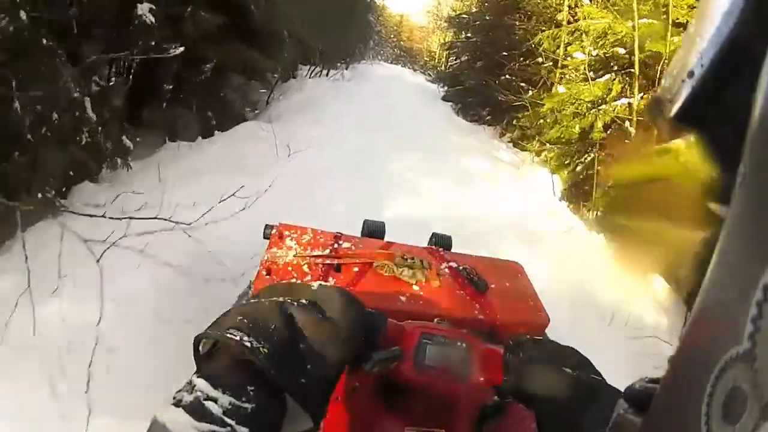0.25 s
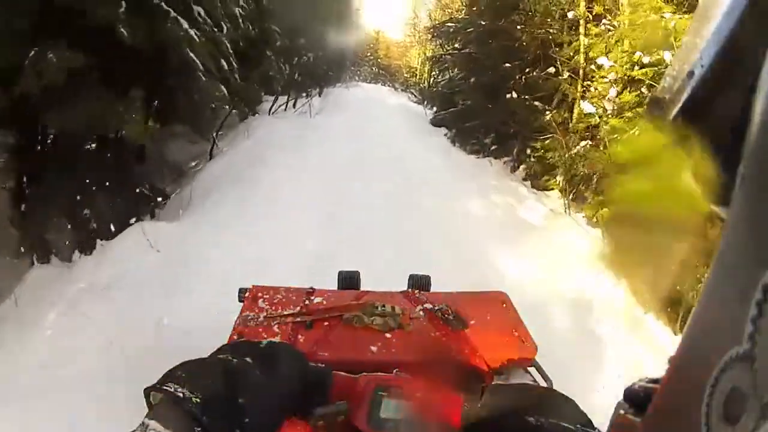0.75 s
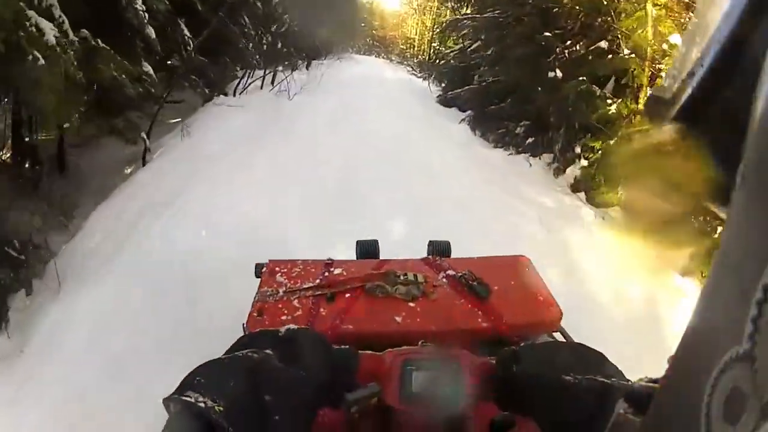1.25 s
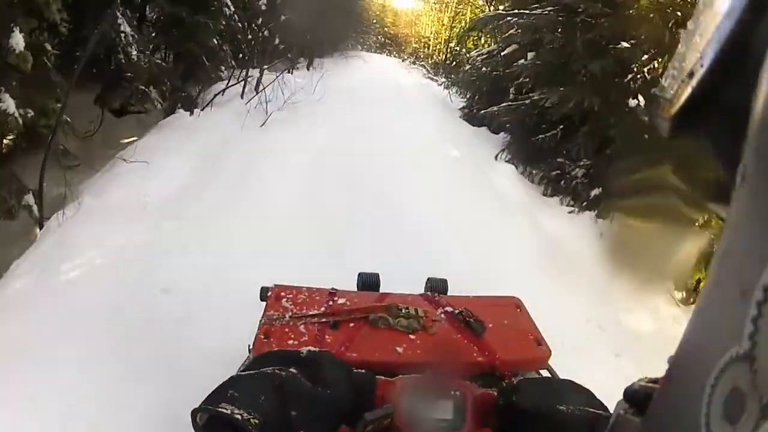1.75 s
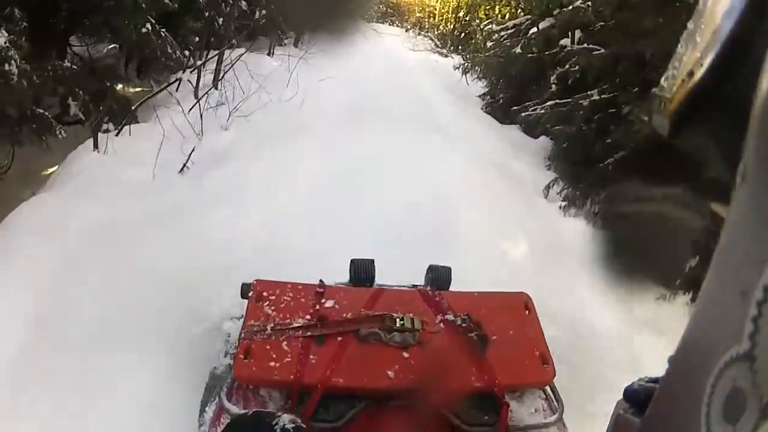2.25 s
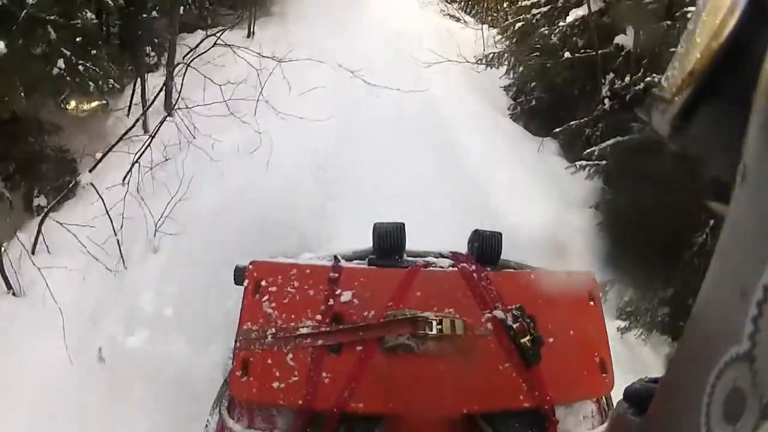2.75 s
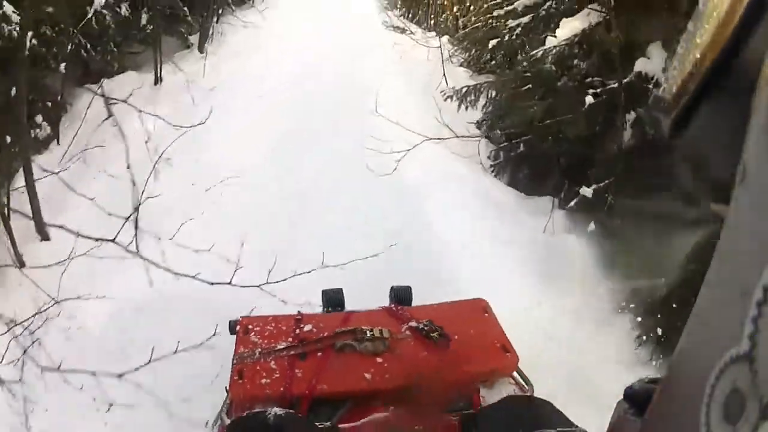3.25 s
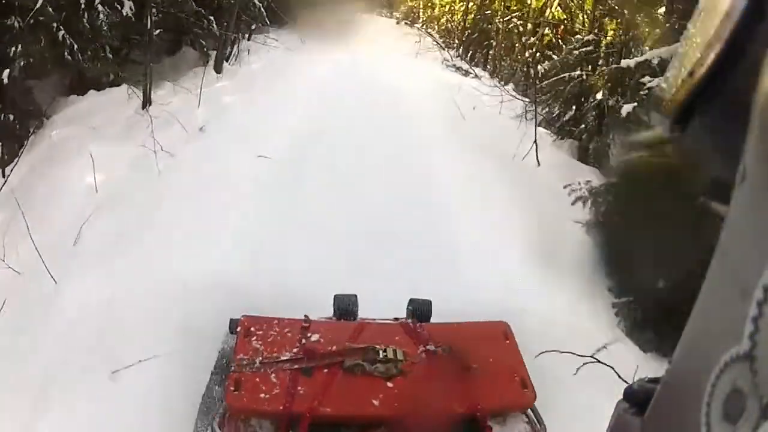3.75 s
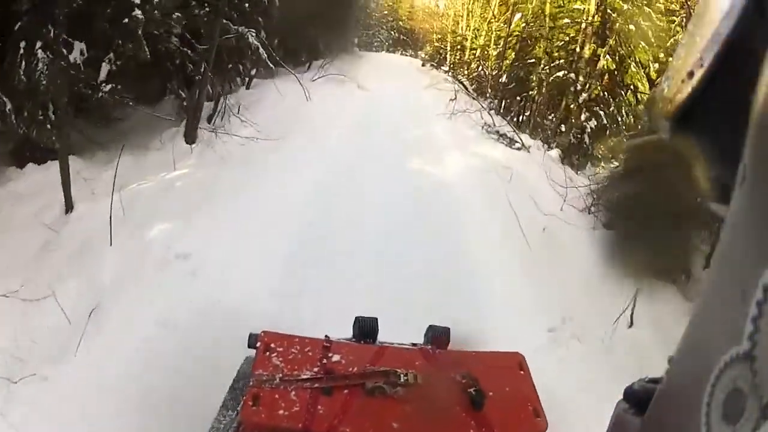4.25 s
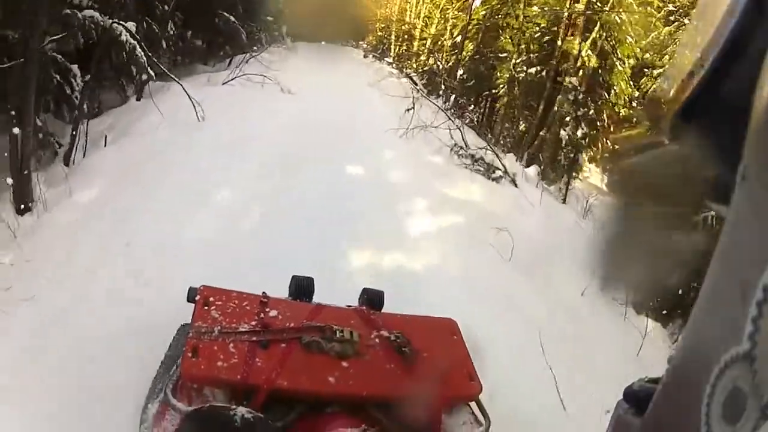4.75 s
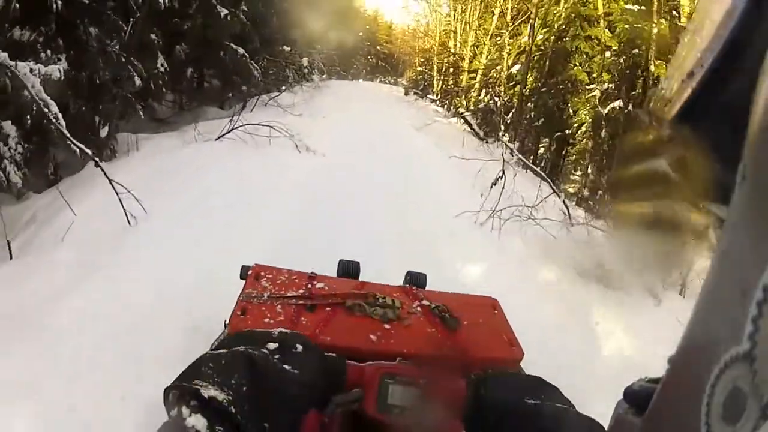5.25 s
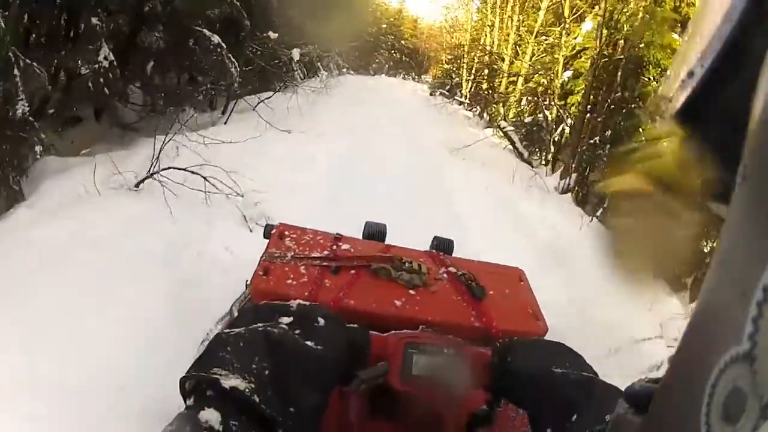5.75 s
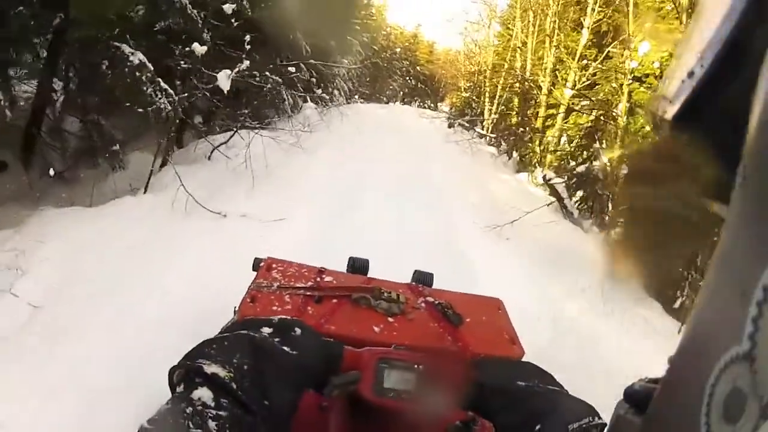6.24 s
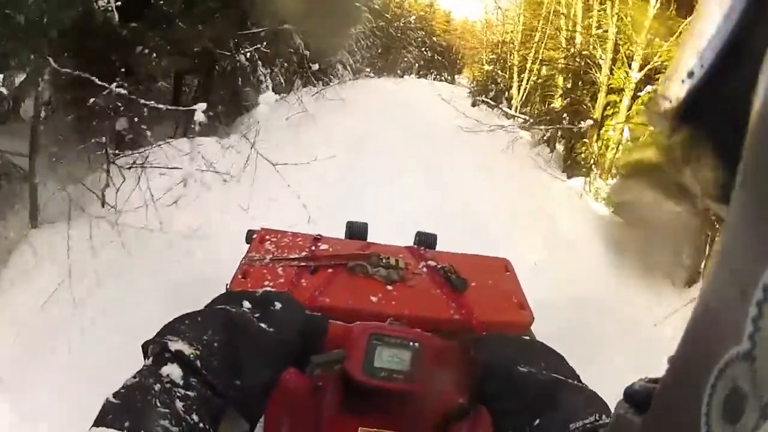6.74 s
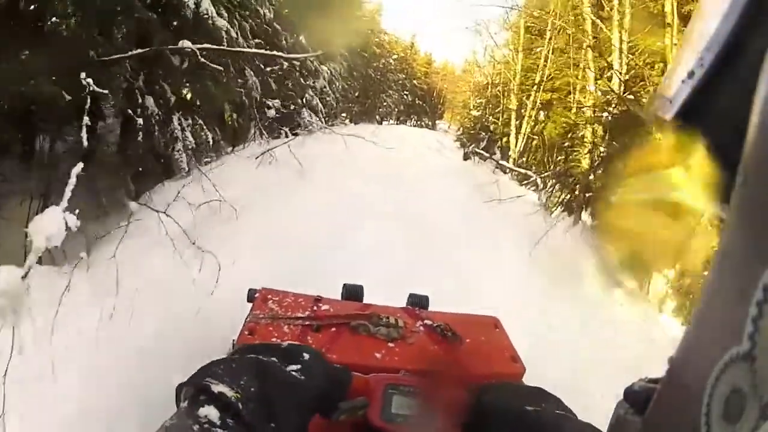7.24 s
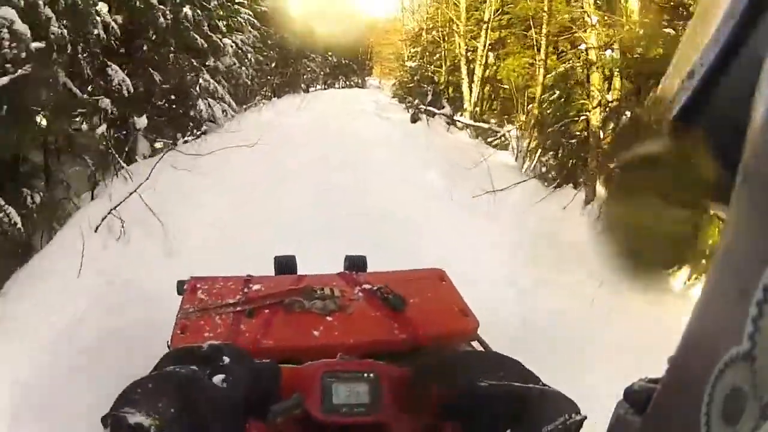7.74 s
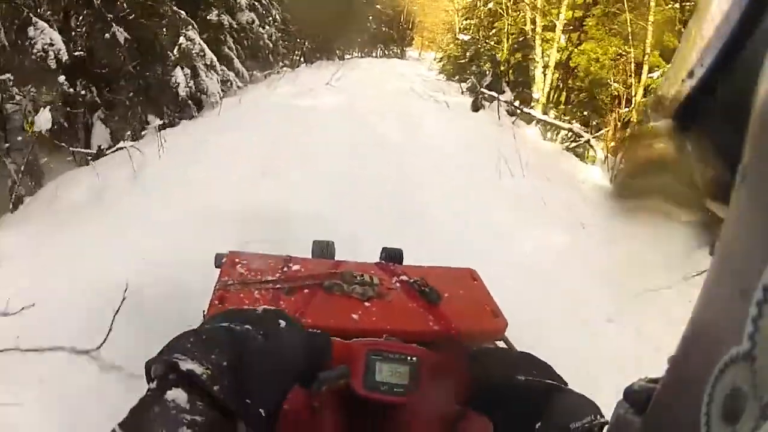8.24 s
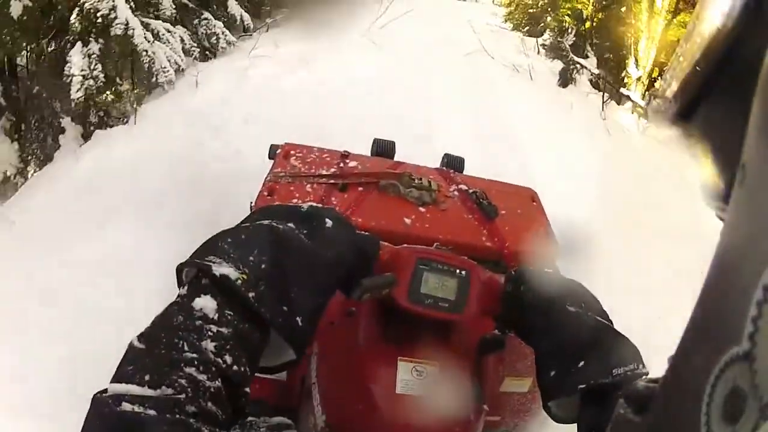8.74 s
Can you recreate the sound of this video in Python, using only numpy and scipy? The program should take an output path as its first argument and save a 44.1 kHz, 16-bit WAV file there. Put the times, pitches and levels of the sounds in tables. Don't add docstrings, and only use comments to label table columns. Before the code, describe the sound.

A quad bike engine labours steadily through deep snow, its raspy, rattling drone sagging twice, then climbing and holding strong.

```python
import sys
import numpy as np
from scipy import signal
from scipy.fft import rfft, irfft
from scipy.io import wavfile
from scipy.ndimage import uniform_filter1d

SR = 44100
rng = np.random.default_rng(int(sys.argv[2]) if len(sys.argv) > 2 else 0)


def transcribe(signal):
    frames = np.atleast_2d(signal).T
    limited = np.clip(frames, -1, 1)
    pcm = np.round(limited * 32767).astype(np.int16)
    wavfile.write(sys.argv[1], SR, pcm)


def nominal_scale(level):
    x = np.asarray(level, float) / 20
    return 10 ** x


N = 396459
T = np.arange(N) / SR
CRUISE_HZ, CRUISE_DB = 53, -25


def evened(x):
    return x / np.sqrt(np.mean(x ** 2) + 1e-20)


def coloured(points):
    hz, db = np.transpose(points)
    log_hz = np.log(np.fft.rfftfreq(N + 1, 1 / SR) + 1)
    shape_db = np.interp(log_hz, np.log(hz), db, left=-90, right=-90)
    spectrum = rfft(rng.standard_normal(N + 1)) * nominal_scale(shape_db)
    return evened(irfft(spectrum, N + 1)[:N])


def drift(hz, at):
    knots = np.arange(0, N / SR + 1, 1 / hz)
    return 1.22 * np.interp(at, knots, rng.standard_normal(len(knots)))


def ring(x, hz, width):
    r = np.exp(-np.pi * width / SR)
    poles = [1, -2 * r * np.cos(2 * np.pi * hz / SR), r * r]
    once = signal.lfilter([1], poles, x)
    return evened(signal.lfilter([1], poles, once))


def resonances(x, table):
    return evened(sum(nominal_scale(db) * ring(x, hz, width) for hz, width, db in table))


def controls(table):
    s, *columns = np.transpose(table)
    return [np.interp(T, s, c) for c in columns]


def bumps(rows):
    return sum(top * np.exp(-((T - s) / np.where(T < s, rise, fall)) ** 2) for s, top, rise, fall in rows)


def per_wave(turns, spread_db):
    phase = turns + .1
    second = phase % 1 > .34
    firing = 2 * np.floor(phase).astype(int) + second
    strength_db = spread_db * rng.standard_normal(2400)[firing + 2]
    return nominal_scale(uniform_filter1d(strength_db, size=60))


def gate(turns, first, second, decay, steady):
    rush = first * np.exp(-(turns % 1) / decay)
    rush = rush + second * np.exp(-((turns - .33) % 1) / decay)
    return evened(uniform_filter1d(steady + rush, size=30))


def blows(turns, first, second):
    opens = []
    for lead in (.015, .7):
        count = np.floor(turns + lead + .007 * drift(90, T))
        opens.append(np.diff(count, prepend=0) > 0)
    return (first * opens[0] + second * opens[1]) * per_wave(turns, 0.97)


# (frequency [Hz], density [dB per Hz])
RUMBLE_SPECTRUM = [(25, -37), (70, 0), (130, -8), (250, -3), (500, 2), (800, -4), (1100, -3), (1400, -5)]


def rumble(turns, level_db):
    rush = gate(turns, 0.97, 0.2, 0.14, 0.93)
    return nominal_scale(level_db - 19) * rush * coloured(RUMBLE_SPECTRUM)


# (frequency [Hz], width [Hz], level [dB])
CASING_RINGS = [(928, 43, 1), (1049.7, 63, 4)]


def casing(turns, hz, level_db):
    knocks = rng.standard_normal(N) * gate(turns, 1.0, 1.24, 0.077, 0.14)
    loose_db = 1.18 * (54.5 - hz)
    return nominal_scale(level_db - 8.0 + loose_db) * resonances(knocks, CASING_RINGS)


# (frequency [Hz], density [dB per Hz])
RASP_SPECTRUM = [(680, -18.5), (1150, -9.5), (1390, -7.5), (1490, -5.5), (1620, -8.5), (1820, -1),
                 (1910, -4), (2470, -1), (3020, -18), (3370, -12.5), (4310, -24), (5250, -22),
                 (5900, -27.5), (7670, -49), (13000, -120)]
# (frequency [Hz], width [Hz], level [dB])
HOUSING_RINGS = [(1249, 210, -7), (1648, 180, 0.5), (2002, 306, -1), (2481, 240, -1)]


def rasp(turns, level_db, sharp):
    hiss = coloured(RASP_SPECTRUM)
    dull = signal.butter(4, 3000, fs=SR, output="sos")
    gas = hiss * gate(turns, 1.1, .55, .22, .9) * per_wave(turns, .6)
    gas = signal.sosfiltfilt(dull, gas)
    churn = hiss - signal.sosfiltfilt(dull, hiss)
    churn = churn * gate(turns, .35, .3, .2, 1.1)
    crack = resonances(blows(turns, 0.81, 0.8), HOUSING_RINGS)
    sharp = np.clip(sharp, 0, .9)
    mix = np.sqrt(1 - sharp ** 2) * gas + 1.14 * churn + sharp * crack
    return nominal_scale(level_db + .25 * drift(11, T)) * mix


PRESSURE_WAVES = [
    (0, .17, .011, .17, .03, .1),
    (.305, .22, .015, .24, .035, .05),
    (.66, .03, .03, .09, .03, .15),
]


def puff_shape(k, hz):
    w = 2 * np.pi * k
    lag = 0.031 * (54.4 - hz) / 8
    shape = 0
    for n, (place, dip, width, puff, delay, decay) in enumerate(PRESSURE_WAVES):
        suction = dip * width * np.sqrt(2 * np.pi) * np.exp(-(w * width) ** 2 / 2)
        push = puff * decay * np.exp(-1j * w * delay)
        push = push / (1 + 1j * w * decay) / (1 + 1j * w * width / 2)
        shape = shape + (push - suction) * np.exp(-1j * w * (place + lag * (n == 1)))
    return shape * np.exp(-1j * w * .07 * (k > 15))


# (multiple of the cycle, level [dB])
EASED_ORDERS = [(1, -14), (2, -8), (3, -2), (4, -8), (5, -2), (6, 0), (7, -11), (8, -7), (9, -8), (10, -13),
                (11, -13), (12, -17), (13, -28), (14, -22), (15, -19), (16, -25), (17, -26), (18, -28),
                (19, -27), (20, -23)]
PART_ORDERS = [(1, -11), (2, -14), (3, 0), (4, -6), (5, -14), (6, -1), (7, -4), (8, -16), (9, -6),
               (10, -11), (11, -28), (12, -14), (13, -17), (14, -25), (15, -25), (16, -20), (17, -25),
               (18, -19), (19, -22), (20, -23)]
FULL_ORDERS = [(1, -10), (2, -20), (3, 0), (4, -5), (5, -13), (6, -1), (7, -4), (8, -15), (9, -9), (10, -8),
               (11, -16), (12, -14), (13, -12), (14, -18), (15, -25), (16, -12), (17, -9), (18, -20),
               (19, -12), (20, -24)]
FREE_ORDERS = [(1, -8), (2, -21), (3, 0), (4, -5), (5, -9), (6, -3), (7, -5), (8, -13), (9, -5), (10, -6),
               (11, -14), (12, -27), (13, -11), (14, -15), (15, -21), (16, -12), (17, -14), (18, -19),
               (19, -13), (20, -23)]
ORDER_SPEEDS = [46.7, 50.14, 54.63, 55.1]


def exhaust(turns, hz, gaps_db, level_db, bark_db, casing_db):
    slow = slice(0, N, 16)
    k = np.transpose(FULL_ORDERS)[0][:, None]
    phases = np.angle(puff_shape(k, hz[slow]))
    patterns = np.array([EASED_ORDERS, PART_ORDERS, FULL_ORDERS, FREE_ORDERS])[:, :, 1].T
    db = []
    for n, pattern in enumerate(patterns):
        db.append(np.interp(hz[slow], ORDER_SPEEDS, pattern) + 0.73 * np.sqrt(n) * drift(3, T[slow]))
    dullness_db = np.minimum(bark_db - level_db + 5.5, 0)[slow]
    top_of_bark = np.clip(k - 11.5, 0, 2) * (k < 16)
    height = nominal_scale(np.array(db) + 0.68 * dullness_db * top_of_bark)
    groups = [(0, 7, level_db - .3), (7, 15, bark_db - .7),
              (15, 20, casing_db - 1.0 - .8 * (54.4 - hz))]
    for first, last, group_db in groups:
        total = np.sqrt((height[max(first, 2):last] ** 2).sum(0))
        height[first:last] *= nominal_scale(group_db[slow]) / total
    height[[1, 3, 4, 0]] = nominal_scale(np.array(gaps_db)[:, slow])
    out = np.zeros(N)
    for order, size, phase in zip(2 * np.pi * k, height, phases):
        out += np.repeat(size, 16)[:N] * np.cos(order * turns + np.repeat(phase, 16)[:N])
    return np.sqrt(2) * per_wave(turns, .55) * out


# (time [s], speed change [Hz], exhaust change [dB], half length [s])
DRIFT_LURCHES = [(0.171, 0.74, 1.2, 0.077), (0.498, .3, 1.2, .1), (1.25, .1, 2.5, .06),
                 (2.27, 0.28, 0.5, .1), (2.864, 0.39, 1.5, 0.063), (3.0, -0.27, -2.5, .04),
                 (3.093, 0.096, 1.5, .05), (3.224, -0.61, -1, .05), (3.4, 0.197, 1, .08),
                 (4.019, -.6, 0.5, 0.051), (4.139, 0.28, -1.5, 0.059), (5.9, -.4, 0, .1),
                 (8.351, 0.78, 0.8, .2)]


def lurches():
    speed = bumps([(s, up, w, w) for s, up, db, w in DRIFT_LURCHES])
    level = bumps([(s, db, w, w) for s, up, db, w in DRIFT_LURCHES])
    return speed, level


# (time [s], cycles a second [Hz])
ENGINE_SPEED = [(0, 53.25), (.3, 52.6), (.87, 50.58), (1.35, 50.2), (1.53, 48), (1.77, 47.52), (2.1, 50.33),
                (2.52, 49.24), (2.73, 46.26), (3.03, 46.6), (3.42, 52.69), (3.95, 53.3), (4.46, 55.82),
                (4.98, 53), (5.35, 54.01), (7.38, 54.6), (7.75, 52.65), (8.99, 53.23)]


def engine_speed(lurch_hz):
    hz, = controls(ENGINE_SPEED)
    return uniform_filter1d(hz, size=2600) + .08 * drift(7, T) + lurch_hz


# (time [s], exhaust level [dB], helmet turned toward the pipe [dB])
THROTTLE_AND_HEAD = [(0.0, -27, -1.5), (0.02, -26, 0.6), (1.33, -27.5, -0.1), (1.5, -29, 1),
                     (2.0, -26, 3.5), (2.23, -27.5, 2), (2.5, -32, 0.8), (2.73, -32.5, -1.5),
                     (3.6, -25, 2.4), (3.91, -28, -0.7), (4.51, -28, -0.6), (4.78, -28, -0.3),
                     (5.46, -25.5, 0.4), (5.83, -25.5, 0.7), (6.23, -24, -0.1), (7.91, -25.5, -0.3),
                     (8.91, -26.5, 0.6), (8.99, -27, 0.1)]


def throttle(lurch_db):
    level_db, turn_db = controls(THROTTLE_AND_HEAD)
    return level_db + 0.52 + .4 * drift(9, T) + lurch_db, turn_db


# (time [s], strength [0-1], rise [s], fall [s])
TRACK_SLIPS = [
    (2.47, .5, .15, .1),
    (4.0, 1.01, .12, .22),
    (4.45, 0.29, 0.25, .3),
]


def slipping():
    return bumps(TRACK_SLIPS)


# (time [s], level [dB])
CASING_JOLTS = [(.2, 0), (1.2, 2.5), (1.6, 6), (1.8, 3.5), (1.95, 2.5), (3.6, 2), (4.12, 2), (4.98, -3.5),
                (7.96, -0.5), (8.36, 0.5)]


def jolts():
    return bumps([(s, db, 0.075, 0.075) for s, db in CASING_JOLTS])


# (level at cruise [dB], per dB of exhaust [dB], per Hz of speed [dB],
# share of the helmet turn, change while slipping [dB])
BARK_LAW = (-31.5, 0.34, 0.62, 1.03, 1)
RASP_LAW = (-37.5, 0.27, 0.56, 0.73, 3.5)
CASING_LAW = (-37.5, 1, 1, 0.1, 3)
THUD_LAW = (-40, .36, 0.8, .1, 1.1)


def layer(law, hz, level_db, turn_db, slip):
    cruise_db, per_db, per_hz, facing, slip_db = law
    engine_db = per_db * (level_db - CRUISE_DB) + per_hz * (hz - CRUISE_HZ)
    return cruise_db + engine_db + facing * turn_db + slip_db * slip


# (cycles a second [Hz], second [dB], fourth [dB], fifth [dB])
CANCELLED_ORDERS = [(46.9, -14, -11.5, -8), (48, -15, -11.5, -11), (50.7, -18.5, -11, -17.5),
                    (52.8, -23, -12, -27), (53.7, -23, -10.5, -19.5), (55, -24, -9, -15.5)]
# (second [dB], fourth [dB], fifth [dB])
CANCELLED_SLIP = (-12, -1.5, 10.5)


def cancelled_orders(hz, level_db, turn_db, slip):
    speeds, *unders = np.transpose(CANCELLED_ORDERS)
    gaps_db = []
    for under, slip_db in zip(unders, CANCELLED_SLIP):
        gaps_db.append(level_db + np.interp(hz, speeds, under) + slip_db * slip + 1.2 * drift(4, T))
    return gaps_db + [layer(THUD_LAW, hz, level_db, turn_db, slip)]


def scene():
    lurch_hz, lurch_db = lurches()
    hz = engine_speed(lurch_hz)
    level_db, turn_db = throttle(lurch_db)
    slip = slipping()
    bark_db, rasp_db, casing_db = (layer(law, hz, level_db, turn_db + 0.76 * drift(9, T), slip)
                                   for law in (BARK_LAW, RASP_LAW, CASING_LAW))
    casing_db = casing_db + jolts() + 0.96 * drift(6, T)
    gaps_db = cancelled_orders(hz, level_db, turn_db, slip)
    sharp = 0.65 + 0.03 * (casing_db - CASING_LAW[0])
    turns = np.cumsum(hz) / SR + 0.0011 * drift(45, T)
    mix = rumble(turns, level_db) + casing(turns, hz, casing_db) + rasp(turns, rasp_db, sharp)
    return (mix + exhaust(turns, hz, gaps_db, level_db, bark_db, casing_db))[None]


# (frequency [Hz], step over the band level [dB])
STORAGE_STEPS = [(2800, -22), (3900, -2), (4600, 7), (5400, 4), (6250, 11), (6700, 3), (7700, 11),
                 (8200, -1), (9500, -10), (11850, -10), (11900, 40), (12100, 40), (12150, -10)]


def thinned(x, size=2048, count=7):
    hz, t, z = signal.stft(x[0], SR, "cosine", nperseg=size, noverlap=size // 2)
    power = uniform_filter1d(abs(z) ** 2, size=12, axis=0)
    band_db = 10 * np.log10(uniform_filter1d(power, size=12, axis=1) + 1e-14)
    chance = uniform_filter1d(rng.standard_normal((len(hz) // count + 1, len(t))), size=4, axis=1)
    chance = np.repeat(chance, count, axis=0)[:len(hz)]
    step_db = band_db + np.interp(hz, *np.transpose(STORAGE_STEPS))[:, None] + 9.0 * chance
    step = nominal_scale(np.maximum(step_db, -97))
    rounded = z / (abs(z) + 1e-12) * step * np.floor(abs(z) / step + .4)
    return signal.istft(rounded, SR, "cosine", nperseg=size, noverlap=size // 2)[1][None, :N]


def band_limit(x):
    return signal.sosfilt(signal.butter(12, 14920, fs=SR, output="sos"), x)


def record(dry):
    hold_hz = 12000
    slow = signal.resample_poly(dry, hold_hz, SR, axis=1)
    held = signal.resample_poly(np.repeat(slow, 4, axis=1), SR, 4 * hold_hz, axis=1)
    return band_limit(thinned(held[:, :N]))


dry = scene()
out = record(dry)
transcribe(out)
```